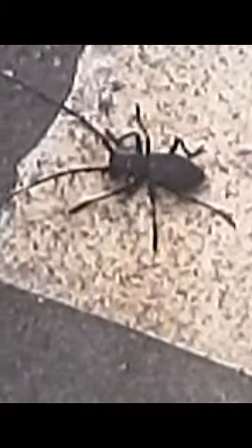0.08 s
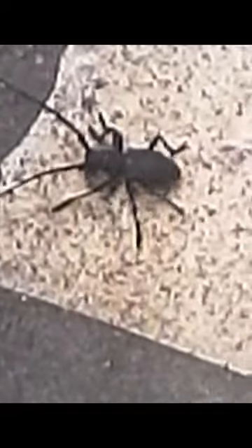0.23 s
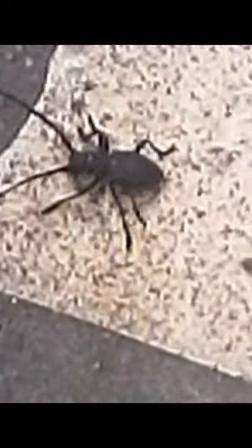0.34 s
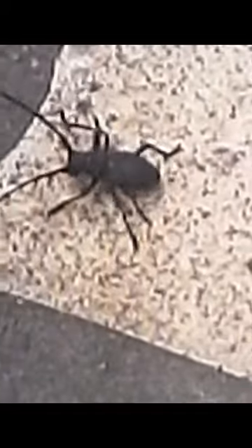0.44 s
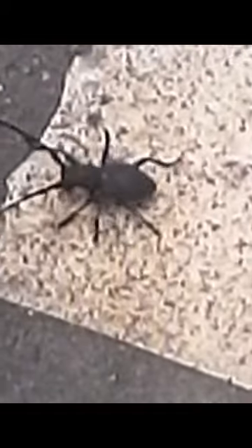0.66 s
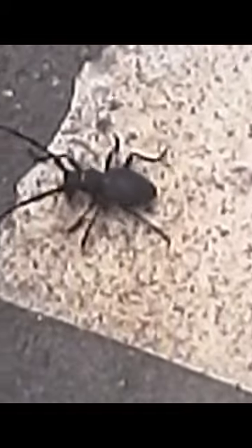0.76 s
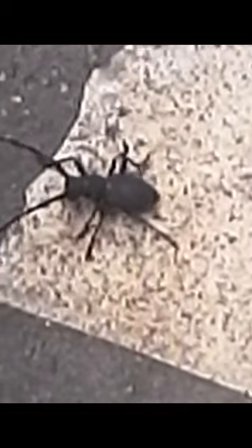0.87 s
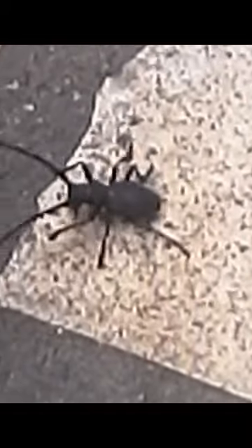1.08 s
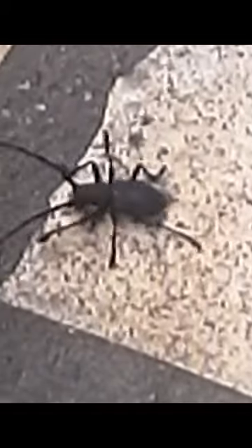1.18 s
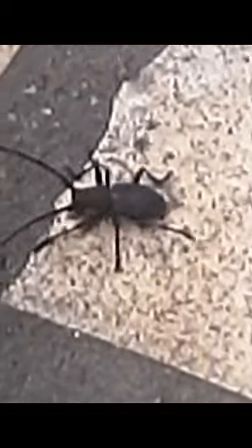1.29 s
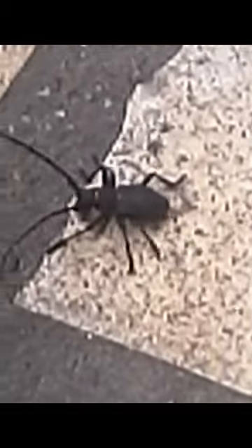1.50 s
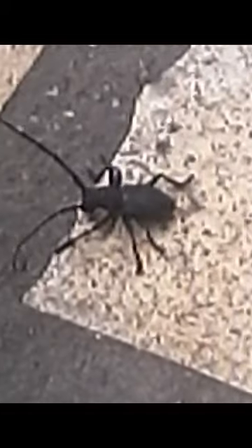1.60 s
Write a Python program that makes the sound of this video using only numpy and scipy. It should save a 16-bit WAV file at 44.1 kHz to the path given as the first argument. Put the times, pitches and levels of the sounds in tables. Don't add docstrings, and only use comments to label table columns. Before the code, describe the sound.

One dry, rapidly warbling bird rasp, fairly close and slightly left, swells and stops with short wall echoes; faint falling chirps follow over town rumble and steady hiss, picked up by a small stereo camera microphone.

```python
import sys
import numpy as np
from scipy import signal
from scipy.fft import rfft, irfft
from scipy.io import wavfile
from scipy.ndimage import uniform_filter1d

SR = 44100
rng = np.random.default_rng(int(sys.argv[2]) if len(sys.argv) > 2 else 0)


def master_out(mix):
    frames = np.transpose(np.atleast_2d(mix))
    ceiling = np.clip(frames, -1, 1)
    pcm = np.round(ceiling * 32767).astype(np.int16)
    wavfile.write(sys.argv[1], SR, pcm)


def makeup_ratio(level_db):
    decades = np.asarray(level_db, float) / 20
    return 10 ** decades


N = 72765


def walk(rate):
    k = max(int(SR / rate), 2)
    steps = np.repeat(rng.standard_normal(N // k + 2), k)
    drift = uniform_filter1d(uniform_filter1d(steps, k), k)[:N]
    return drift / drift.std()


def level(x, db):
    return x * makeup_ratio(db) / np.sqrt(np.mean(x ** 2))


def curve(table, t):
    rows = np.array(table, float)
    return [np.interp(t, rows[:, 0], column) for column in rows.T[1:]]


def delay(x, seconds):
    turn = 2 * np.pi * np.arange(N + 1) / (2 * N) * SR * seconds
    return irfft(rfft(x, 2 * N) * np.exp(-1j * turn), 2 * N)[:N]


def tone(hz, db):
    return np.sqrt(2) * makeup_ratio(db) * np.sin(2 * np.pi * np.cumsum(hz) / SR)


def tail(x, t60):
    t = np.arange(SR // 2) / SR
    rise_s = .012
    decay = 1000. ** (-t / t60) * np.minimum(t / rise_s, 1)
    response = rng.standard_normal((2, len(t))) * decay
    response = response / np.sqrt((response ** 2).sum(1, keepdims=True))
    return signal.fftconvolve(x[None], response, axes=1)[:, :N]


def air(shape, db):
    swell_db, flicker_db = .4, 1.0
    f = np.maximum(np.fft.rfftfreq(N, 1 / SR), 1)
    rows = np.array(shape, float)
    colour = np.interp(np.log(f), np.log(rows[:, 0]), rows[:, 1], -90, -90)
    spectrum = rfft(rng.standard_normal(N)) * makeup_ratio(colour)
    swell = swell_db * walk(2.33)
    band = np.round(2 * np.log2(f))
    out = 0
    for b in range(9, 29):
        out = out + irfft(spectrum * (band == b), N) * makeup_ratio(swell + flicker_db * walk(14.54))
    return level(out, db)


def town_rumble(narrow):
    # (frequency [Hz], density [dB per Hz])
    mid_colour = [(18, -53), (30, -3), (92, 0.5), (210, -11.5), (361, -18.5), (439, -18.5), (487, -19),
                  (1100, -33.5), (1430, -82), (2420, -120)]
    side_colour = [(18, -33), (30, 9), (92, -4), (366, -14.5), (419, -14), (487, -15.5), (689, -24),
                   (1100, -36.5), (1430, -56), (2420, -120)]
    mid = air(mid_colour, -54.5) * makeup_ratio(2.5 * narrow)
    side = air(side_colour, -55.5) * makeup_ratio(-9 * narrow)
    return np.array([mid, side])


def microphone_hiss(narrow):
    # (frequency [Hz], density [dB per Hz])
    mid_colour = [(590, -38), (1000, -5), (1260, -4), (2860, 2.5), (4980, 4.5), (5990, -3), (7630, -6.5),
                  (12000, 2), (15800, 0.5)]
    side_colour = [(590, -12), (1000, -19.5), (2050, -20), (3560, -9.5), (4920, -6.5), (5520, -8.5),
                   (6570, -13.5), (11700, -7.5), (15800, -6.5)]
    mid = air(mid_colour, -58) * makeup_ratio(4.5 * narrow)
    side = air(side_colour, -51.5) * makeup_ratio(.5 * narrow)
    return np.array([mid, side])


def circuit_whine():
    return tone(np.full(N, 12750), -80)


def sparrows(t):
    trill_hz, swing_hz, trill_db = 147.2, 570, 5.0
    # (start [s], length [s], from [Hz], to [Hz], level [dB])
    chirps = [
        (.055, 0.038, 4220, 4030, -54),
        (0.104, 0.029, 3670, 2990, -60),
        (0.251, 0.0475, 3735, 3170, -45),
        (.94, 0.051, 4810, 3990, -53),
        (0.984, 0.039, 3930, 3176, -47.5),
        (1.19, 0.017, 5310, 4150, -52.5),
        (1.27, 0.026, 4350, 3880, -68),
        (1.36, 0.024, 4170, 3900, -52.5),
        (1.392, 0.039, 3700, 2960, -55),
        (1.44, 0.0074, 3860, 3600, -78),
    ]
    out = 0
    for start, length, from_hz, to_hz, db in chirps:
        u = np.clip((t - start) / length, 0, 1)
        trill = np.sin(2 * np.pi * trill_hz * (t - start))
        hz = from_hz + (to_hz - from_hz) * u + swing_hz * trill
        out = out + np.sin(np.pi * u) * tone(hz, db + trill_db * trill)
    return out


def far_off(chirps):
    direct = np.array([chirps, delay(chirps, 7e-5)])
    return direct * makeup_ratio(-2.5) + makeup_ratio(-2.5) * tail(chirps, .18)


def opening_whistle(t):
    # (time [s], pitch [Hz], level [dB])
    arch = [
        (.2095, 5000, -56),
        (.2125, 5150, -39),
        (.218, 5450, -51),
        (.2225, 5680, -46),
        (.234, 5600, -45),
        (.239, 5250, -54),
        (.2425, 5050, -39),
        (.247, 4900, -58),
    ]
    hz, db = curve(arch, t)
    whistle = tone(hz, db) * (t > arch[0][0]) * (t < arch[-1][0])
    tick_s, tick_db, tick_hz, tick_t60_s = .2098, -39, 6400, .003
    age = np.maximum(t - tick_s, 0)
    tick = makeup_ratio(tick_db) * np.sin(2 * np.pi * tick_hz * age) * 1000. ** (-age / tick_t60_s)
    return whistle + tick


def stereo_circuit(t):
    narrow_s, narrow_fade_s = .21, .03
    widen_s, widen_fade_s = .855, .17
    closing = (t - narrow_s) / narrow_fade_s
    opening = (widen_s - t) / widen_fade_s + 1
    return np.clip(np.minimum(closing, opening), 0, 1)


def throat(x):
    # (frequency [Hz], gain [dB])
    response = [(3300, -28), (3520, -13), (3780, 2.5), (3950, 2), (4350, 2), (5100, -.5), (5500, -5),
                (5950, -10)]
    rows = np.array(response, float)
    gain_db = np.interp(np.fft.rfftfreq(N, 1 / SR), rows[:, 0], rows[:, 1])
    return irfft(rfft(x) * makeup_ratio(gain_db), N)


def rasp(t):
    # (time [s], centre pitch [Hz], swing [Hz], warble rate [Hz], level [dB])
    warble = [
        (.225, 4450, 301.3, 167, -42),
        (.28, 4515, 260, 167.3, -48.5),
        (.35, 4450, 370, 155.6, -40),
        (.45, 4357, 580, 156.6, -36.5),
        (.52, 4545, 733, 153.4, -32.5),
        (.65, 4606, 865, 153.2, -37),
        (.8, 4646, 815, 146.9, -36.5),
        (.885, 4648, 865, 153, -41),
        (.903, 4610, 918, 160, -56),
    ]
    skew, dwell = .3, .08
    limp_hz = 55.6
    rate_jitter, pitch_jitter_hz = .014, 35
    throb_db, throb_turn, flutter_db = 1.2, .4, 1.2
    fade_in_s = .04
    hz, swing_hz, rate, db = curve(warble, t)
    turn = 2 * np.pi * np.cumsum(rate * (1 + rate_jitter * walk(57.44))) / SR
    turn = turn + skew * np.cos(turn)
    pitch = hz + swing_hz * (np.sin(turn) - dwell * np.cos(2 * turn))
    pitch = pitch + limp_hz * np.sin(turn / 2) + pitch_jitter_hz * walk(90)
    db = db + throb_db * np.sin(turn - 2 * np.pi * throb_turn) + flutter_db * walk(77.27)
    gate = np.clip((t - warble[0][0]) / fade_in_s, 0, 1) * (t < warble[-1][0])
    return throat(tone(pitch, db) * gate)


def yard(call):
    # (delay [ms], left [dB], right [dB])
    walls = [
        (3.45, -9, -9),
        (5.3, -13, -12),
        (9.1, -12, -11),
        (14.7, -13, -14),
    ]
    ground_ms, ground_db = (1.835, 1.72), (-3, -6)
    pan_db, right_lag_s = 2, .000088
    sides = []
    for c in (0, 1):
        heard = call + makeup_ratio(ground_db[c]) * delay(call, ground_ms[c] / 1000)
        for echo in walls:
            heard = heard + makeup_ratio(echo[1 + c]) * delay(call, echo[0] / 1000)
        sides.append(heard)
    near = np.array([sides[0] * makeup_ratio(pan_db), delay(sides[1], right_lag_s)])
    return near + makeup_ratio(-10) * tail(call, .3)


def motor_hum(t):
    peak_s, length_s = .69, .074
    hz = 188.7 * (1 + .0053 * walk(7.2))
    return tone(hz, -55.5) * np.exp(-((t - peak_s) / length_s) ** 2)


def scene():
    t = np.arange(N) / SR
    narrow = stereo_circuit(t)
    mid, side = town_rumble(narrow) + microphone_hiss(narrow)
    mid = mid + motor_hum(t)
    side = side + circuit_whine()
    background = np.array([mid + side, mid - side])
    call = opening_whistle(t) + rasp(t)
    return yard(call) + far_off(sparrows(t)) + background


def low_pass(x):
    return signal.sosfilt(signal.butter(12, 16340, fs=SR, output="sos"), x)


def record(dry):
    top_cut = signal.ellip(10, .2, 60, 15550, fs=SR, output="sos")
    mix = signal.sosfilt(top_cut, dry) - .0009
    return low_pass(mix)


dry = scene()
out = record(dry)
master_out(out)
```